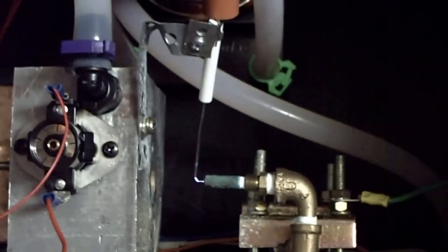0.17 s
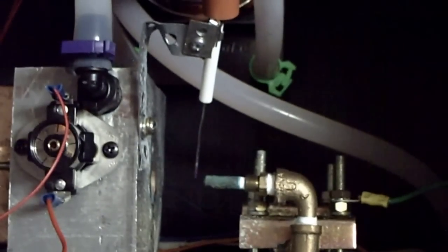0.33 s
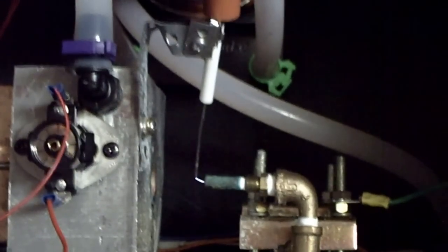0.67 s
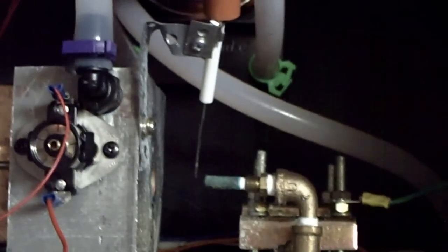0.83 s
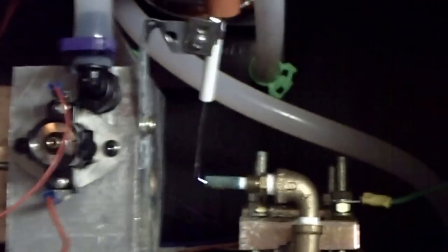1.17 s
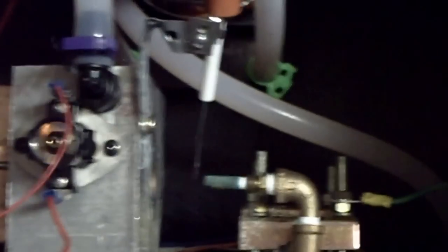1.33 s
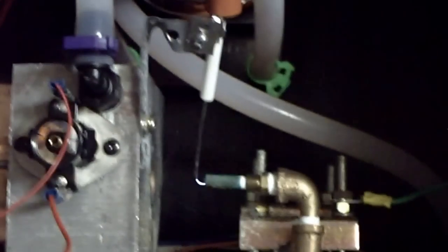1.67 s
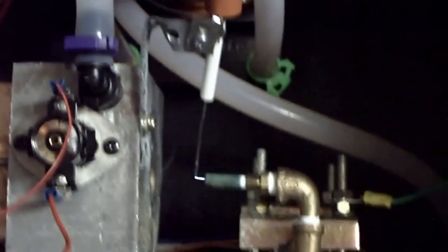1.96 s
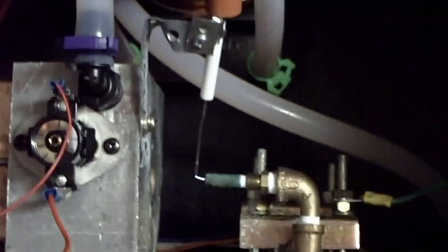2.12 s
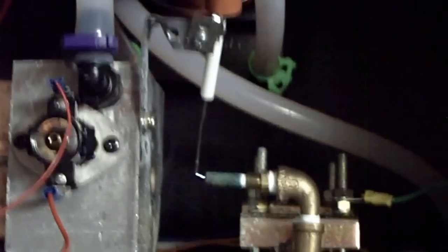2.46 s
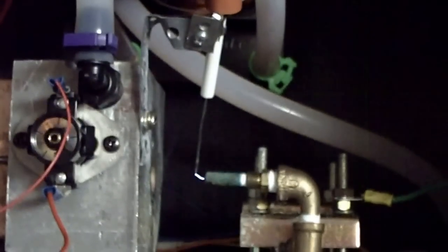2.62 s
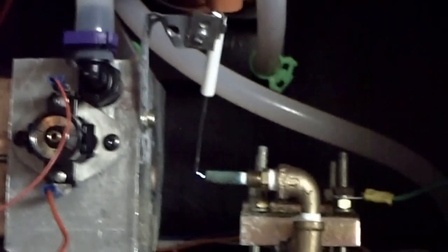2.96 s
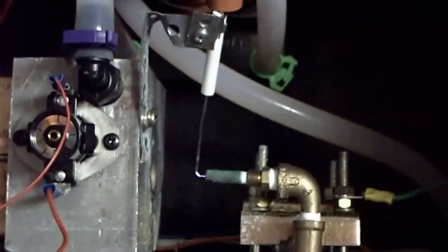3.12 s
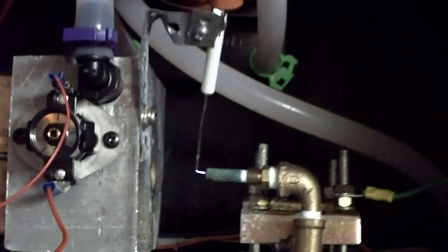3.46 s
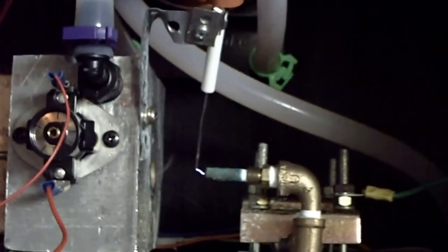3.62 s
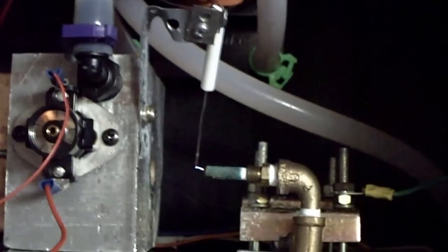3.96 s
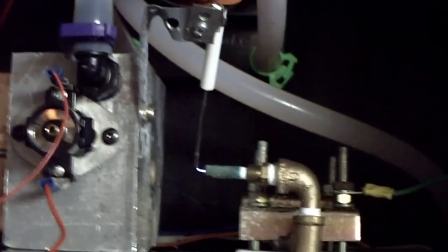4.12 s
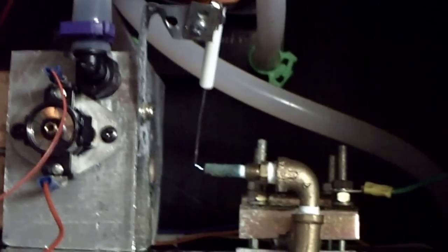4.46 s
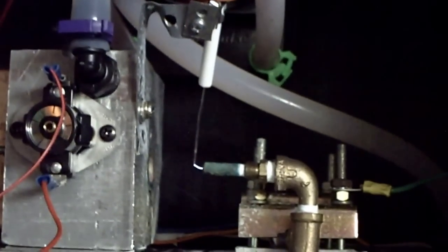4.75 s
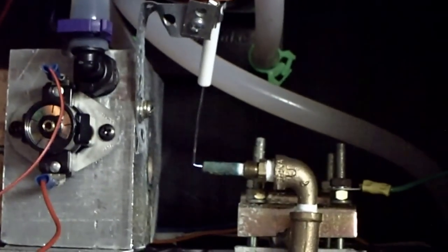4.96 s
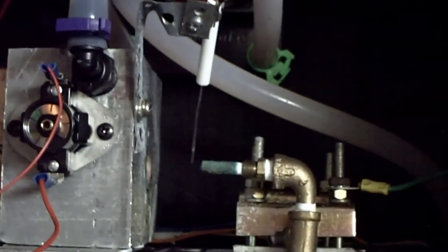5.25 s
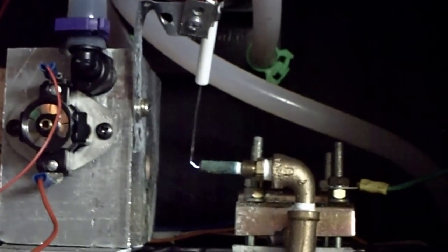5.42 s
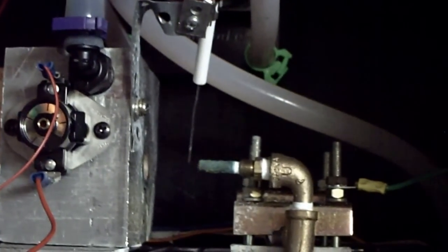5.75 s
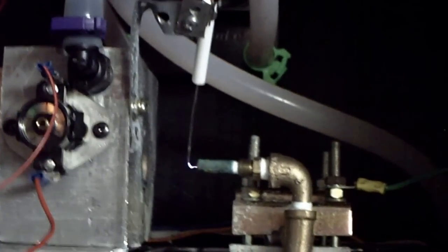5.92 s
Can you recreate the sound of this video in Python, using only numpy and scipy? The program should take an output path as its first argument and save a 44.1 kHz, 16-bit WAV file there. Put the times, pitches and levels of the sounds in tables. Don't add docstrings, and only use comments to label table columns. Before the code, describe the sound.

Sharp electric igniter sparks snap six times a second with a brief metallic ring, over a steady low equipment hum and airy fan rush.

```python
import sys
import numpy as np
from scipy import signal
from scipy.fft import rfft, irfft, next_fast_len
from scipy.io import wavfile
from scipy.ndimage import map_coordinates

SR = 44100
rng = np.random.default_rng(int(sys.argv[2]) if len(sys.argv) > 2 else 0)


def transcribe(u):
    v = np.clip(np.atleast_2d(u).T, -1, 1)
    q = np.round(v * 32767).astype(np.int16)
    wavfile.write(sys.argv[1], SR, q)


def level_to_linear(level):
    exponent = np.asarray(level, float) / 20
    return 10 ** exponent


N = 268392
SPAN = 16384

SUPPLY_HZ, CYCLES_PER_SPARK, FIRST_STRIKE_S, SPARK_COUNT = 60, 10, -.0039, 37
EXTRA_WAITS = [
    .6,
    5.45,
]
# start_s, extra_level_db, straight_path_db (against the echoes)
STRAY_ARCS = [(.32941, -.6, -.2), (.49618, 0, -1.8), (.67953, 0, -6.2), (.8465, 0, -7.5),
              (1.18152, 0, -1.9), (1.34725, .8, 2.8), (1.51299, 0, -.7), (1.84632, -.8, -4.1),
              (2.01539, .7, 1.9), (2.6792, 0, -11), (2.84684, 0, 3.5), (3.01338, .4, 3.3),
              (3.51345, 0, -3.4), (4.01235, -1.2, -1.6), (4.17931, .6, 2.8), (4.34586, -1, 2.2),
              (5.34953, 1.6, .5), (5.69696, 1.9, 0), (5.86343, .6, -13.5), (6.0296, 0, -3.3)]
USUAL_STRAIGHT_DB = 2.4
FAT_PER_STRAIGHT_DB = 0.13
# time_s, level_db, fatness_db (below 4 kHz)
MIC_DRIFT = [(0, -30.5, -2), (.85, -31, 0.1), (1.01, -32, -0.8), (1.5, -31.5, 0.2), (2.4, -30.5, -1.3),
             (2.85, -32, -0.5), (3.5, -31, .2), (3.7, -30, -0.1), (4.85, -29.6, -1.1), (5.18, -32.5, 0),
             (5.55, -32, -1.8), (6.05, -31.5, 0)]
# pitch_hz, level_db
SHOCK_COLOUR = [(150, -47), (400, -18), (700, -9), (1300, -11), (2500, -8), (3030, -8), (3500, -15.5),
                (4300, -6.5), (5200, -7), (5900, -3.5), (8000, 0), (9700, -1), (11000, -5), (15000, -18)]
# delay_ms, reflection_factor (negative = turned over)
ECHO_SURFACES = [(.52, -.5), (.98, -.47), (1.3, -1.0), (1.75, .55), (2.07, .45), (2.37, .62), (2.97, .5),
                 (3.36, -.55), (3.96, -.8), (4.39, .5), (12.8, .3), (18.8, .22), (28.8, -.14), (35.6, .08)]
# pitch_hz, level_db
SIDE_DULLING = [(8000, 0), (10000, -2.5), (12000, -8)]
RING_PITCHES = [1290, 2293, 2928, 3143, 3660, 4317, 4618, 5760, 6427, 6739, 7472, 7902, 8200, 8408, 8774,
                8936, 9496, 9689, 9969, 10518, 11531]
# level_db, fade_60_db_s
RING_FADES = [(-9.5, 0.0081), (-6, 0.025), (-20.5, 0.093), (-6.5, 0.038), (-7.5, 0.028), (-1.5, 0.018),
              (-30, 0.017), (-7.5, 0.016), (-22, 0.04), (-8.5, 0.061), (-22, 0.024), (-5, 0.093),
              (-7, 0.045), (-13, 0.075), (-7, 0.08), (-5.5, 0.073), (-13.5, 0.052), (-4, 0.069),
              (-17, 0.06), (-8, 0.035), (-21, 0.021)]
# pitch_hz, fade_60_db_s
ROOM_FADES = [(1000, 0.1), (3000, 0.18), (6000, 0.14), (9000, 0.17), (13000, 0.086)]
FAN_HZ = 83.92
# multiple, level_db (rms)
FAN_TONES = [(1, -52.5), (4, -50.5), (5, -66), (8, -64), (10, -66.5), (11, -72), (12, -64.5), (16, -67.5)]
MAINS_HZ = 120
# multiple, level_db (rms)
HUM_TONES = [(1, -51), (2, -45.5), (9, -72.5)]
# pitch_hz, level_db (per Hz)
RUMBLE_COLOUR = [(15, -28), (30, -4.5), (45, -15), (70, -9), (95, -4), (170, 1), (210, -5), (300, -7.5),
                 (390, -15.5), (450, -12.5), (520, -17), (1000, -20.5), (1350, -23.5), (1500, -61)]
# pitch_hz, level_db (per Hz)
HISS_COLOUR = [(900, -26), (1400, 1.5), (2200, 2.5), (3800, -0.5), (4250, -5), (4330, 0), (6000, -5.5),
               (7500, -3.5), (9800, -6), (11000, -16), (12200, -20), (14000, -18)]
# pitch_hz, level_db (per Hz)
WHINE_COLOUR = [(3800, -30), (4000, -8), (4070, 0), (4130, -6), (4240, -6), (4290, -30)]
# start_s, peak_level_db, pitch_hz
BENCH_TAPS = [(.2955, -52, 6500), (.13, -49, 8600), (.9405, -54, 3000), (1.226, -40.5, 1050),
              (1.914, -46, 3000), (2.574, -42, 800), (2.803, -49, 3000), (3.101, -43.5, 950),
              (3.43, -45, 1700), (3.641, -48, 6000), (4.055, -44, 950), (4.256, -58, 10000),
              (4.887, -49, 1050), (5.561, -43.5, 900), (5.802, -44, 750)]
# pitch_hz, level_db
MIC_TREBLE = [(12300, 0), (13000, -7), (13600, -17), (14000, -29), (14500, -40), (16000, -75)]


def unit(x):
    return x / np.sqrt(np.mean(x ** 2) + 1e-20)


def along(points, hz):
    point_hz, value = np.transpose(points)
    return np.interp(np.log(hz + 1), np.log(point_hz + 1), value)


def wobble(rate):
    knots = rng.standard_normal(int(N * rate / SR) + 4)
    return map_coordinates(knots, [np.arange(N) * rate / SR])


def place(starts, sounds):
    out = np.zeros(N + 2 * SPAN)
    for at, sound in zip(starts, sounds):
        out[at + SPAN:][:SPAN] += sound[:len(out) - at - SPAN]
    return out[SPAN:SPAN + N]


def strikes():
    s = FIRST_STRIKE_S + np.arange(SPARK_COUNT) * CYCLES_PER_SPARK / SUPPLY_HZ
    for after_s in EXTRA_WAITS:
        s = s + (s > after_s) / SUPPLY_HZ
    extra_db = np.zeros(len(s))
    straight_db = np.full(len(s), USUAL_STRAIGHT_DB)
    for start_s, stray_extra_db, stray_straight_db in STRAY_ARCS:
        nearest = np.abs(s - start_s).argmin()
        s[nearest] = start_s
        extra_db[nearest] = stray_extra_db
        straight_db[nearest] = stray_straight_db
    time_s, drift_db, drift_fat_db = np.transpose(MIC_DRIFT)
    level_db = np.interp(s, time_s, drift_db) + extra_db
    fat_db = np.interp(s, time_s, drift_fat_db)
    fat_db = fat_db + FAT_PER_STRAIGHT_DB * np.clip(straight_db, -4, 4)
    return s, level_db, straight_db, fat_db


def scatter(count, early_t60, room_db, rise_s):
    hz, t, z = signal.stft(rng.standard_normal((count, SPAN)), SR, nperseg=64)
    parts_fade = level_to_linear(-60 * t / early_t60)
    room_fade = level_to_linear(room_db - 60 * t / along(ROOM_FADES, hz)[:, None])
    tails = signal.istft(z * (parts_fade + room_fade), SR, nperseg=64)[1][:, :SPAN]
    rise = 1 - np.exp(-np.arange(SPAN) / SR / np.clip(rise_s, 1e-4, 6e-4))
    tails = tails * rise
    return tails / np.linalg.norm(tails, axis=1).mean()


def drifting(tails, keep):
    out = [tails[0]]
    for new in tails[1:]:
        out.append(keep * out[-1] + np.sqrt(1 - keep ** 2) * new)
    return np.array(out)


def cabinet_ring():
    t = np.arange(SPAN) / SR
    ring = np.zeros(SPAN)
    for hz, (level_db, fade_s) in zip(RING_PITCHES, RING_FADES):
        fade = level_to_linear(level_db - 60 * t / np.clip(fade_s, .02, .055))
        ring = ring + fade * np.sin(2 * np.pi * (hz * t + rng.random()))
    ring = ring * (1 - np.exp(-t / .0015))
    return ring / np.linalg.norm(ring)


def sparks():
    s, level_db, straight_db, fat_db = strikes()
    t, hz = np.arange(SPAN) / SR, np.fft.rfftfreq(SPAN, 1 / SR)
    tails = scatter(count=2 * len(s), early_t60=0.029, room_db=-4.5, rise_s=0.00066)
    steady = drifting(tails[::2], keep=np.clip(.99 - 12 * t, .87, 1))
    diffuse = np.sqrt(.8) * steady + np.sqrt(.2) * tails[1::2]

    paths = level_to_linear(straight_db + 1.5)[:, None]
    chance = rng.standard_normal((len(s), len(ECHO_SURFACES), 2))
    for k, (delay_ms, factor) in enumerate(ECHO_SURFACES):
        delay_s = delay_ms / 1000 + 6e-6 * chance[:, k, :1]
        strength = factor * level_to_linear(1.5 * chance[:, k, 1:])
        paths = paths + strength * np.exp(-2j * np.pi * hz * delay_s)
    paths = paths * level_to_linear(along(SIDE_DULLING, hz)) + level_to_linear(8) * rfft(diffuse)

    fat = 1.5 * fat_db[:, None] / (1 + (hz / 4000) ** 4)
    shock = 1j * level_to_linear(along(SHOCK_COLOUR, hz) + fat)
    ring_level = level_to_linear(-1.5) * level_to_linear(1.4 * rng.standard_normal((len(s), 1)))
    heard = shock * paths + ring_level * rfft(cabinet_ring())

    lead = 64
    at = np.floor(s * SR).astype(int)
    shift_s = s[:, None] - (at[:, None] - lead) / SR
    heard = heard * np.exp(-2j * np.pi * hz * shift_s)
    return place(at - lead, level_to_linear(level_db + 24.5)[:, None] * irfft(heard, SPAN))


def tone(base_hz, orders, wander_hz, unsteady_db):
    phase = 2 * np.pi * np.cumsum(base_hz + wander_hz * wobble(2.016)) / SR
    hum = np.zeros(N)
    for multiple, level_db in orders:
        level = np.sqrt(2) * level_to_linear(level_db + unsteady_db * wobble(3.093))
        hum = hum + level * np.sin(round(multiple) * phase + 7 * rng.random())
    return hum


def rush(colour):
    m = next_fast_len(N + SPAN)
    spectrum = rfft(rng.standard_normal(m)) * level_to_linear(along(colour, np.fft.rfftfreq(m, 1 / SR)))
    return unit(irfft(spectrum, m)[:N])


def equipment():
    fan = tone(FAN_HZ, FAN_TONES, wander_hz=0.0852, unsteady_db=1.22)
    hum = tone(MAINS_HZ, HUM_TONES, wander_hz=0.016, unsteady_db=-0.27)
    rumble = level_to_linear(-46.5 + 0.25 * wobble(3.27) + 0.92 * wobble(24.8)) * rush(RUMBLE_COLOUR)
    hiss = level_to_linear(-58.5 + 0.27 * wobble(4.04) + 0.14 * wobble(11)) * rush(HISS_COLOUR)
    whine = level_to_linear(-68.5 + .35 * np.arange(N) / SR + 1.3 * wobble(12)) * rush(WHINE_COLOUR)
    return fan + hum + rumble + hiss + whine


def ticks():
    t = np.arange(SPAN) / SR
    start_s, peak_db, pitch_hz = np.transpose(BENCH_TAPS)
    puffs = rng.standard_normal((len(start_s), SPAN)) * level_to_linear(-60 * t / 0.093)
    ratio = np.fft.rfftfreq(SPAN, 1 / SR) / pitch_hz[:, None]
    resonance = 1j * ratio / (1 - ratio ** 2 + .6j * ratio)
    puffs = irfft(rfft(puffs) * resonance, SPAN)
    puffs = puffs / np.abs(puffs).max(axis=1, keepdims=True)
    return place((start_s * SR).astype(int), level_to_linear(peak_db)[:, None] * puffs)


def scene():
    return (sparks() + equipment() + ticks())[None]


def low_pass(x):
    return signal.sosfilt(signal.butter(12, 14010, fs=SR, output="sos"), x)


def record(dry):
    m = next_fast_len(N + SPAN)
    treble = level_to_linear(along(MIC_TREBLE, np.fft.rfftfreq(m, 1 / SR)))
    heard = irfft(rfft(dry, m) * treble, m)[:, :N]
    return low_pass(heard)


dry = scene()
out = record(dry)
transcribe(out)
```